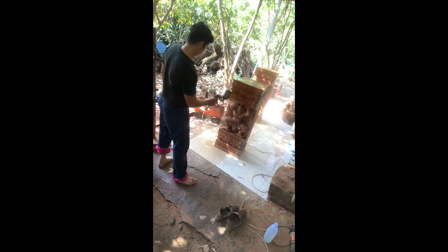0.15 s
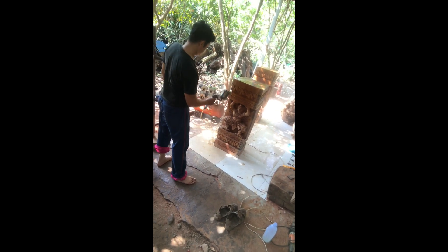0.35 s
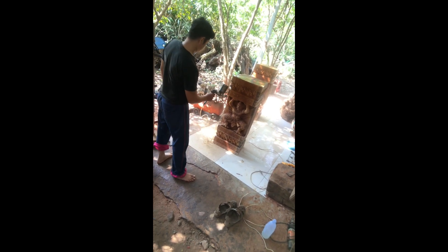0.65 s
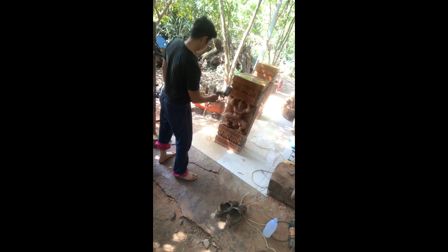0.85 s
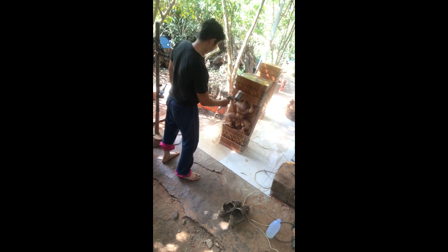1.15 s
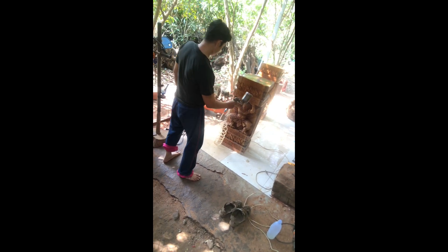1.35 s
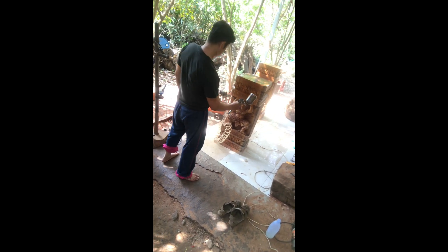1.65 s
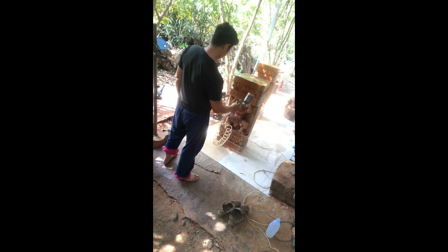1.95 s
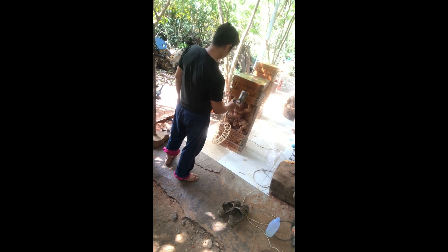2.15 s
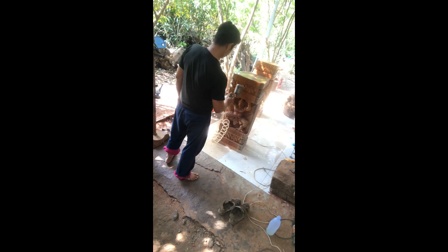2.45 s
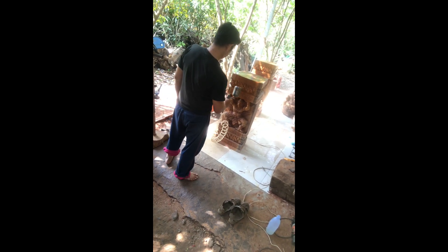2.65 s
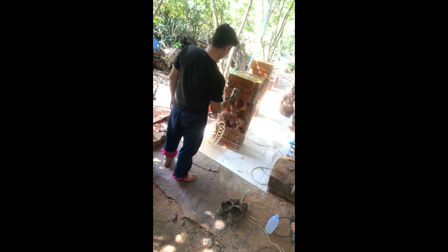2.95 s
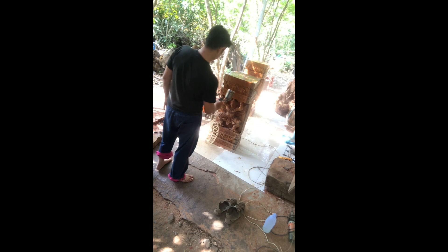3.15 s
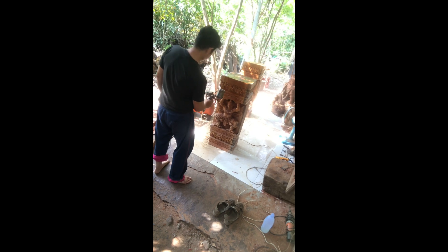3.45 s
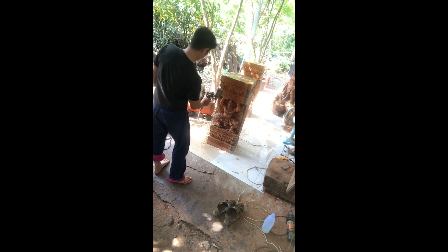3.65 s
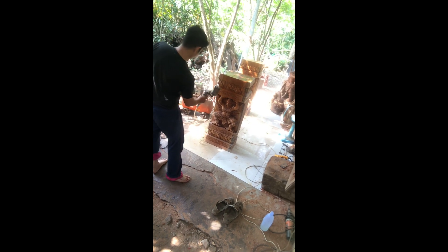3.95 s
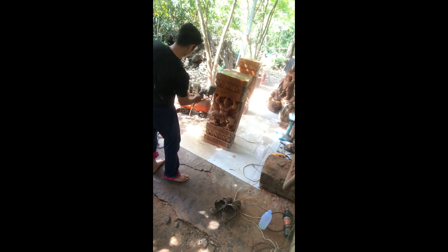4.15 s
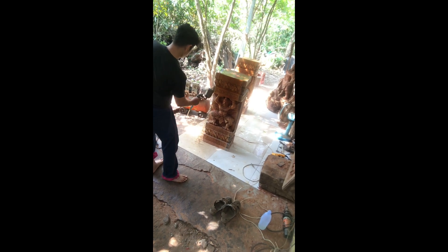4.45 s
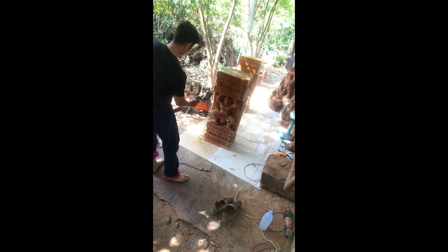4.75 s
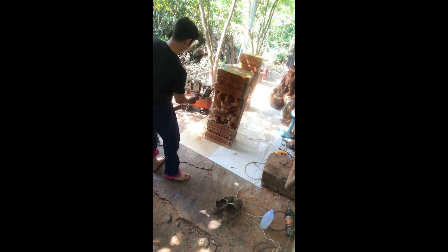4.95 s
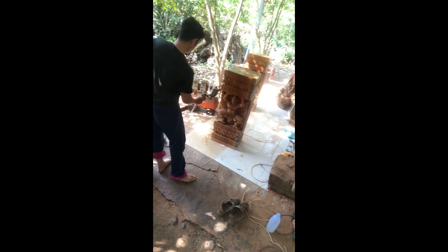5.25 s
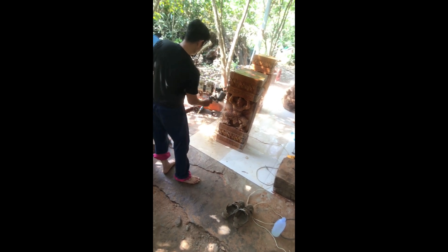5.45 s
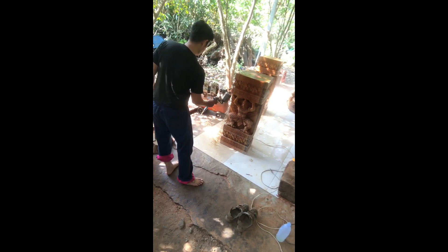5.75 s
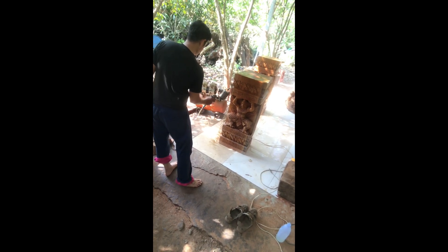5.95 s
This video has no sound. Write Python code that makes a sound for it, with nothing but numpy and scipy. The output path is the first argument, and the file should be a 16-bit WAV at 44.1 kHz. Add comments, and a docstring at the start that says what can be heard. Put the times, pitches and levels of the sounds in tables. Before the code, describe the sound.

Sharp bursts of compressed air and paint mist hit carved wood, stopping and starting, over faint outdoor rumble, birdsong and a far rooster crow.

```python
"""Spray gun in an open workshop

An air spray gun coats a carved wooden post in eight short bursts, under the roof of an open workshop.
The trigger opens the air first (a bright hiss of noise), then the paint, which dulls the jet and washes
over the wood; on release the paint stops first and the hiss flares again.
A far rooster crows in gliding tones, small birds chirp, and a low outdoor rumble and motor hum lie below."""
import sys
import numpy as np
from scipy import signal
from scipy.fft import rfft, irfft, next_fast_len
from scipy.io import wavfile
from scipy.ndimage import map_coordinates

SR = 44100
rng = np.random.default_rng(int(sys.argv[2]) if len(sys.argv) > 2 else 0)


def master_out(mix):
    """Clip the mix to full scale and print it as 16-bit PCM to the path in sys.argv[1]."""
    frames = np.transpose(np.atleast_2d(mix))
    ceiling = np.clip(frames, -1, 1)
    pcm = np.round(ceiling * 32767).astype(np.int16)
    wavfile.write(sys.argv[1], SR, pcm)


N = 269451  # length of the scene in samples


def amp(db):
    """Turn decibels into a gain."""
    return 10 ** (np.asarray(db) / 20)


def unit(x):
    """Scale a sound to an average (rms) strength of 1."""
    return x / np.sqrt(np.mean(x ** 2) + 1e-20)


def along(points, hz):
    """Read a curve of (f/Hz, value) points, spaced by pitch (log frequency)."""
    f, v = np.transpose(points)
    return np.interp(np.log(hz + 1), np.log(f + 1), v)


def ramp(t, start, end):
    """Rise from 0 to 1 between two times (or two frequencies)."""
    return np.clip((t - start) / max(end - start, 1e-4), 0, 1)


def wobble(t, rate):
    """A smooth random curve through `rate` random points a second."""
    points = rng.standard_normal(4096)
    return map_coordinates(points, [(t - t[0]) * rate], mode="wrap")


def filtered(x, response):
    """Pass a sound through a gain that depends on frequency."""
    size = next_fast_len(len(x) + 8192)
    gain = response(np.fft.rfftfreq(size, 1 / SR))
    return irfft(rfft(x, size) * gain, size)[:len(x)]


def noise(t, spectrum):
    """Noise of rms 1, coloured by a curve of (f/Hz, level/dB) points."""
    white = rng.standard_normal(len(t))
    return unit(filtered(white, lambda hz: amp(along(spectrum, hz))))


def add(track, start, sound):
    """Mix a sound into the track from a start time in seconds, cut at the track's end."""
    part = track[round(start * SR):][:len(sound)]
    part += sound[:len(part)]


# trigger pulls, and how each meets the carving: (air opens t/s, air closes t/s, paint delay t/s,
#  air level/dB before surge, sag and paint damping, surge level/dB, wash level/dB, wash centre f/Hz,
#  buffet level/dB, top sizzle level/dB)
PULLS = [(-.02, 0.431, 0.039, -24, 4.5, -42.5, 1710, -60, -0.5),
         (0.737, 1.415, 0.11, -25, 6, -43.5, 1770, -59.5, -1),
         (1.61, 2.401, 0.11, -26, 3, -47.5, 1650, -58, 0),
         (2.682, 3.039, 0.13, -25.5, 4, -44.5, 1670, -61, -0.5),
         (3.675, 4.008, 0.083, -25.5, 8, -40, 2150, -50.5, -3.5),
         (4.282, 4.783, 0.062, -25, 8, -45, 1840, -53.5, -2),
         (5.267, 5.672, .11, -23.5, 6.5, -45.5, 1670, -58.5, 1.5),
         (5.929, 6.2, 0.13, -24, 6, -44, 1780, -61.5, 3)]


def spray_gun():
    """Eight pulls of the trigger; every burst sounds from a new place in the workshop."""
    track = np.zeros(N)
    for pull in PULLS:
        start = max(pull[0], 0)  # the first pull is already under way at the start
        t = start + np.arange(SR) / SR
        add(track, start, workshop(burst(t, pull), early_db=-11, tail_db=-12.0))
    return track


# colour of the air alone: (f/Hz, relative level/dB per Hz)
DRY_AIR = [(150, -45.5), (700, -33.5), (1200, -23.5), (1900, -20), (2800, -15), (4300, -12), (6400, -8.5),
           (7600, -10), (9500, -5.5), (11000, -4.5), (12600, 1), (13700, -1.5), (14600, -2), (16000, -14)]
# colour of the air loaded with paint: (f/Hz, relative level/dB per Hz)
WET_AIR = [(800, -42), (2000, -14.5), (3000, -9.5), (4600, -9.5), (6400, -8.5), (7800, -10), (9300, -5.5),
           (10300, -6.5), (11500, -3), (13100, 1.5), (14600, -5.5), (16000, -8)]
# the fan of mist striking the carving: (multiple of the wash centre, relative level/dB per Hz)
WASH = [(.1, -43), (.25, -14.5), (.44, -16), (.58, -5), (.85, -2.5), (1, -3.5), (1.2, -1.5), (1.4, -4.5),
        (1.65, -6.5), (2.3, -12.5), (4, -48)]
# the air stream buffeting the post: (f/Hz, relative level/dB per Hz)
BUFFET = [(30, -22), (65, -11), (110, -2), (200, -8.5), (330, -3), (500, -7), (1000, -7.5), (1600, -11),
          (4000, -33)]
# narrow peaks and notches in the hiss as heard, partly the microphone's: (centre f/Hz, width f/Hz, level/dB)
COLOURING = [(1854, 95, 2.5), (2440, 130, -0.5), (3200, 92, 0), (4944, 340, -4.5), (5720, 200, 0),
             (6750, 900, 1), (9500, 500, -1), (10390, 530, -4)]
SURGE_S = 0.13  # the pressure stored in the hose runs out with this time constant
SAG_DB_PER_S = 3  # the supply keeps sinking while the trigger is held
PAINT_RISE_S = 0.062  # from the first paint to full flow
PAINT_DAMPING_DB = 4.5  # the jet is this much quieter with paint in it


def burst(t, pull, attack=0.016, shut=0.016, paint_lead=0.056, paint_fall=0.029, flutter_db=0.53,
          sway_db=0.27, spatter_db=1, puff_db=4.5, puff_lag=0.066, puff_length=0.024):
    """One pull: rushing air makes hiss, then paint dulls it and strikes the wood, then air alone (times in s)."""
    opens, closes, paint_delay, air_db, surge_db, wash_db, wash_hz, buffet_db, sizzle_db = pull
    held = np.maximum(t - opens, 0)
    closing = np.exp(-np.maximum(t - closes, 0) / shut)
    valve = ramp(held, 0, attack) ** 2 * closing

    # the paint needle lifts after the air valve and seats before it
    paint_starts = ramp(held - paint_delay, 0, PAINT_RISE_S)
    paint_stops = ramp(t - closes + paint_lead, 0, paint_fall)
    paint = paint_starts * (1 - paint_stops)
    air = np.sqrt(1 - paint) * noise(t, DRY_AIR) + np.sqrt(paint) * noise(t, WET_AIR)

    # the highest hiss is beamed, so it depends on where the gun points
    hiss = unit(filtered(air, lambda hz: amp(sizzle_db * ramp(hz, 7800, 15400))))

    # the hose empties in a surge, the supply sags, and paint damps the jet
    surge = surge_db * np.exp(-held / SURGE_S)
    jet_db = air_db + surge - SAG_DB_PER_S * held - PAINT_DAMPING_DB * paint
    unsteady_db = sway_db * wobble(t, 14) + flutter_db * wobble(t, 70)
    hiss *= amp(jet_db + unsteady_db)

    # paint tears off the tip unevenly, and the hollows of the carving colour its wash
    spatter = amp(wash_db + spatter_db * wobble(t, 90))
    wash = paint * spatter * noise(t, np.multiply(WASH, [wash_hz, 1]))

    # the head of the jet reaches the wood a moment later, as a soft puff
    puff = np.exp(-((held - puff_lag) / puff_length) ** 2)
    buffet = amp(buffet_db + puff_db * puff) * noise(t, BUFFET)

    def colour(hz):
        """Add up the narrow peaks and notches, partly the microphone's."""
        return amp(sum(db * np.exp(-(2 * (hz - centre) / width) ** 2) for centre, width, db in COLOURING))

    return off_the_wood(valve * filtered(hiss + wash + buffet, colour), t)


def off_the_wood(x, t, delay=0.001164, sway=0.000218, share=0.2):
    """The jet and its late copy off the post comb each other; the delay (s) drifts as the hand moves."""
    lag = (delay + sway * wobble(t, 2.95)) * SR  # in samples
    reflection = map_coordinates(x, [np.arange(len(x)) - lag])
    return (x + share * reflection) / np.hypot(1, share)


# how long the tail under the roof takes to fall by 60 dB: (f/Hz, t/s)
ROOF = [(200, 0.76), (1500, 0.54), (5000, 0.51), (13000, 0.32)]


def workshop(x, early_db, tail_db, early_t60=0.081):
    """Direct sound, quick reflections from post and floor, and a tail under the roof; new for each call."""
    # the tail is noise that dies away at its own speed in each frequency band
    hz, t, bands = signal.stft(rng.standard_normal(SR // 2), SR, nperseg=256)
    fade = amp(-60 * t / along(ROOF, hz)[:, None])
    tail = signal.istft(bands * fade, SR, nperseg=256)[1]
    t = np.arange(len(tail)) / SR
    early = rng.standard_normal(len(t)) * amp(-60 * t / early_t60)
    early_part = amp(early_db) * early / np.linalg.norm(early)
    tail_part = amp(tail_db) * tail / np.linalg.norm(tail)
    echo = early_part + tail_part
    echo[0] = 1  # the direct sound
    return signal.fftconvolve(x, echo / np.linalg.norm(echo))


# syllables of a rooster's crow: (start t/s, length t/s, pitch f/Hz, level/dB before fading,
#  second harmonic level/dB re the first at mid-syllable, pitch roughness as a share)
CROW = [(2.45, .13, 803, -54, -6, .018), (2.57, .09, 780, -62, 0, .03), (2.65, .18, 738, -54, -8, .03),
        (2.83, .14, 705, -56, 5, .035), (2.96, .11, 750, -55, -3, .03), (3.11, .08, 738, -62, -9, .035),
        (3.425, .26, 690, -63.5, 2, .012)]
CROW_ARCH = .012  # the pitch lies this share lower at both ends of a syllable
CROW_DULLING_DB = 7  # the second harmonic sinks by this much through a syllable
CROW_ATTACK_S, CROW_RELEASE_S = 0.027, 0.021  # each syllable swells, holds and stops
CROW_FADE_DB_PER_S = 14  # it weakens while it is held


def rooster(third_db=-22, flutter_db=2.2):
    """A far crow, hoarse in the middle, clear at the end: three harmonics swell and fade on an arch of pitch."""
    track = np.zeros(N)
    for start, length, hz, db, second_db, rough in CROW:
        t = np.arange(0, length, 1 / SR)
        swell = ramp(t, 0, CROW_ATTACK_S) * ramp(length - t, 0, CROW_RELEASE_S)
        effort = swell * amp(db - CROW_FADE_DB_PER_S * t)
        arch = CROW_ARCH * (1 - np.sin(np.pi * t / length))
        pitch = hz * (1 - arch + rough * wobble(t, 140))
        phase = 2 * np.pi * np.cumsum(pitch) / SR
        second = amp(second_db - CROW_DULLING_DB * (t / length - .5))
        voice = np.sin(phase) + second * np.sin(2 * phase) + amp(third_db) * np.sin(3 * phase)
        strain = unit(amp(flutter_db * wobble(t, 40)))
        add(track, start, np.sqrt(2) * effort * strain * voice)
    return workshop(track, early_db=-13, tail_db=-9)[:N]


# bird notes: (start t/s, length t/s, first f/Hz, last f/Hz, level/dB)
CHIRPS = [(2.5, 0.046, 4200, 4750, -59.5), (2.54, 0.037, 4850, 3840, -59.5), (2.58, .04, 3800, 4930, -57.5),
          (2.625, .03, 4900, 4340, -65), (3.411, 0.037, 3820, 3510, -68), (3.429, 0.054, 3930, 4440, -67.5),
          (3.527, .13, 2770, 2890, -71), (4.916, 0.055, 4490, 4790, -60), (5.222, 0.043, 3820, 3770, -73)]


def birds(warble=.03):
    """Short whistles that glide in pitch and swell and fade, blurred by strong reflections and a tail."""
    track = np.zeros(N)
    for start, length, from_hz, to_hz, db in CHIRPS:
        t = np.arange(0, length, 1 / SR)
        pitch = np.linspace(from_hz, to_hz, len(t)) * (1 + warble * wobble(t, 390))
        whistle = np.sin(2 * np.pi * np.cumsum(pitch) / SR)
        swell = np.sin(np.pi * t / length)
        add(track, start, 2 * amp(db) * swell * whistle)
    # here the reflections are stronger than the direct sound
    return workshop(track, early_db=5.5, tail_db=5)[:N]


# outdoor background: (f/Hz, relative level/dB per Hz)
YARD = [(20, -21.5), (32, -11), (50, -1), (80, -4.5), (140, -5), (260, -9), (420, -13), (700, -14),
        (1200, -16), (2000, -23), (4300, -27), (5200, -32), (9000, -33), (16000, -34)]
# a far motor's steady tones: (f/Hz, level/dB)
HUM = [(141, -73), (197, -81), (565, -75)]


def yard(level_db=-59.5, drift_db=-0.56, waver=0.44):
    """Outdoor rumble of slowly drifting noise, with motor tones whose phase wavers (radians)."""
    t = np.arange(N) / SR
    hum = np.zeros(N)
    for hz, db in HUM:
        phase = 2 * np.pi * hz * t + waver * wobble(t, 8.6)
        hum += np.sqrt(2) * amp(db) * np.sin(phase)
    rumble = amp(level_db + drift_db * wobble(t, 2.5)) * noise(t, YARD)
    return rumble + hum


def scene():
    """All sources mixed, the same in both channels."""
    mono = spray_gun() + rooster() + birds() + yard()
    return np.array([mono, mono])


TOP_HZ = 15780  # the treble ends here


def record(dry):
    """Cut the treble very steeply at the top of the band."""
    low_pass = lambda hz: 1 / np.sqrt(1 + (hz / TOP_HZ) ** 400)
    return np.array([filtered(channel, low_pass) for channel in dry])


dry = scene()
out = record(dry)
master_out(out)
```